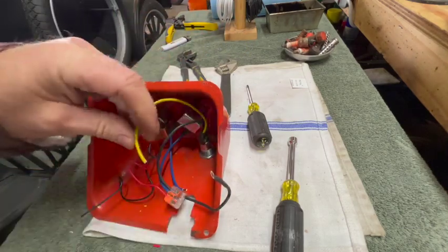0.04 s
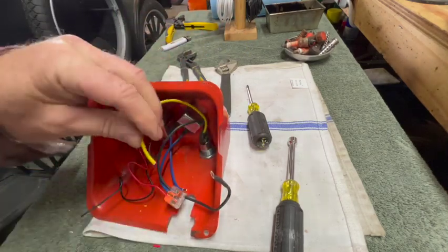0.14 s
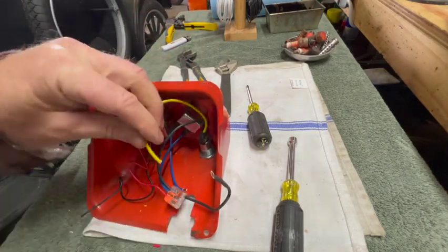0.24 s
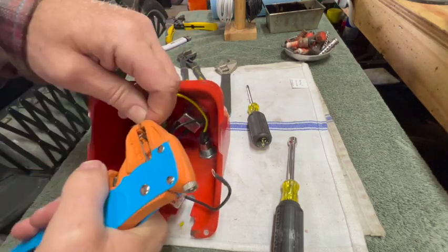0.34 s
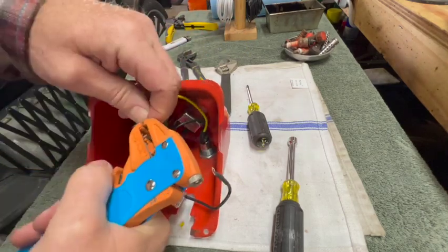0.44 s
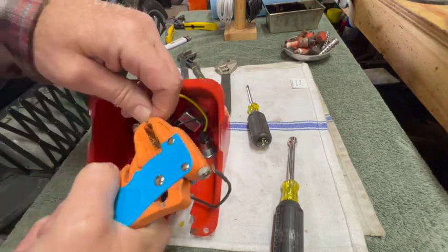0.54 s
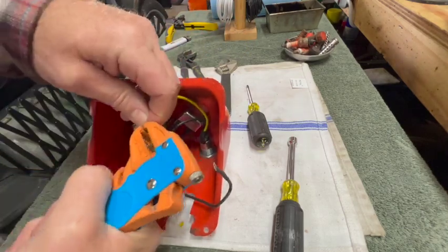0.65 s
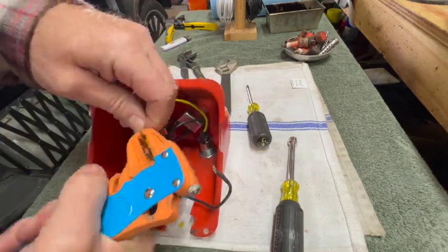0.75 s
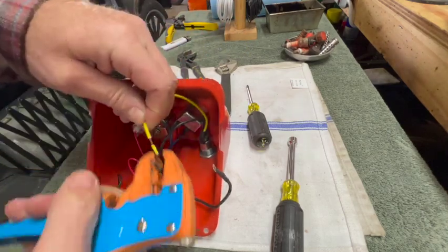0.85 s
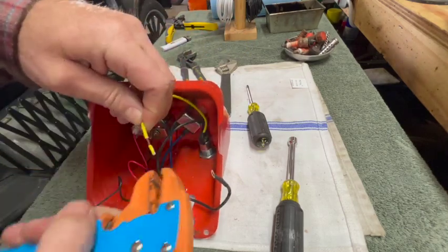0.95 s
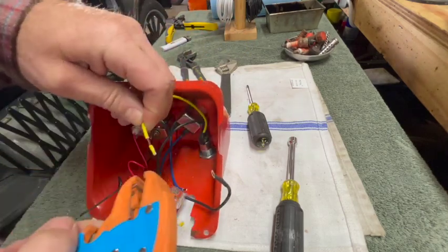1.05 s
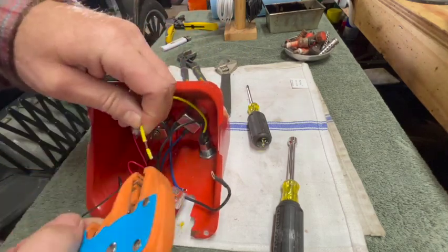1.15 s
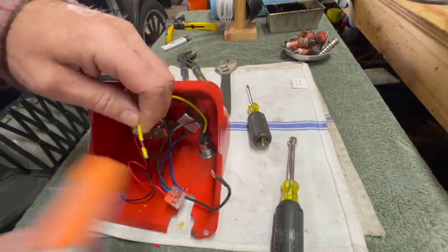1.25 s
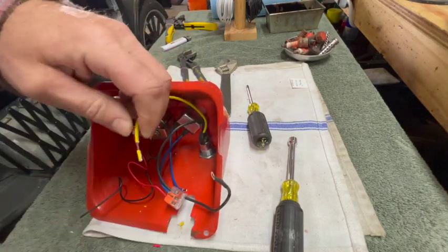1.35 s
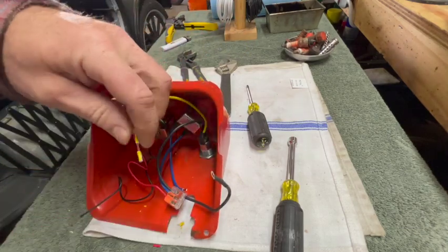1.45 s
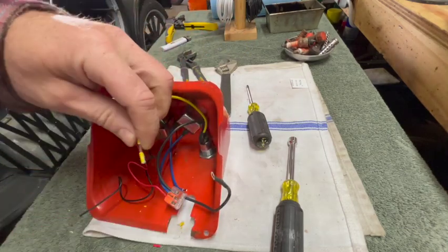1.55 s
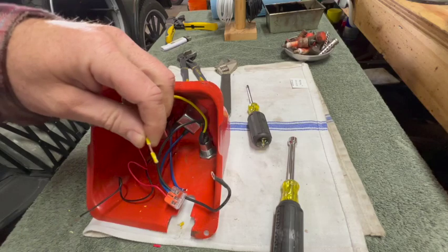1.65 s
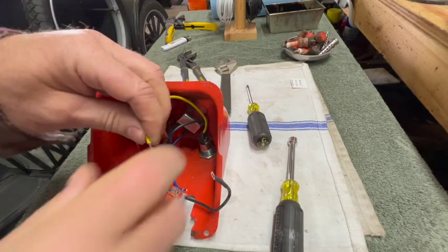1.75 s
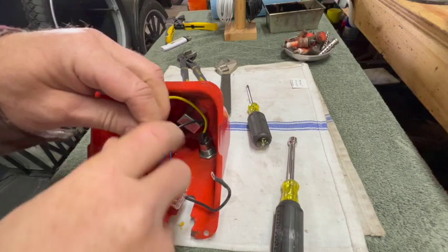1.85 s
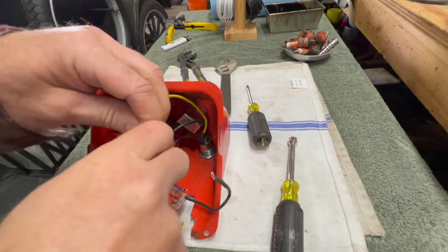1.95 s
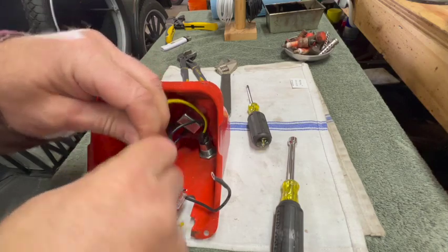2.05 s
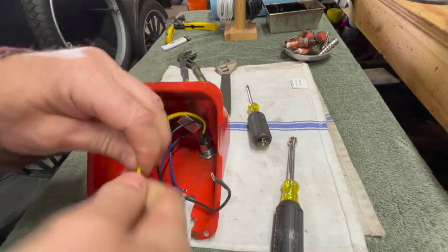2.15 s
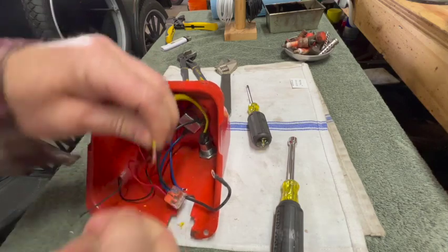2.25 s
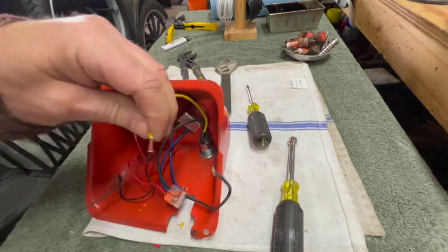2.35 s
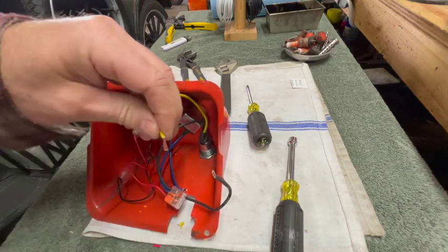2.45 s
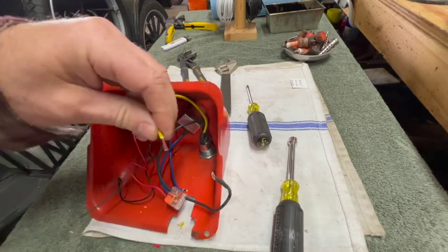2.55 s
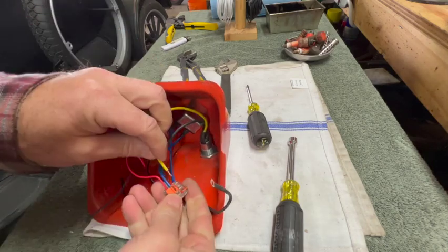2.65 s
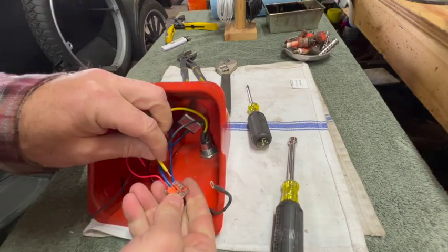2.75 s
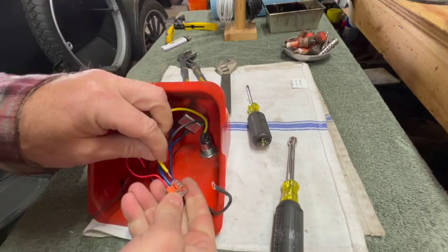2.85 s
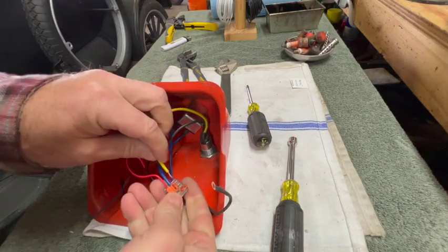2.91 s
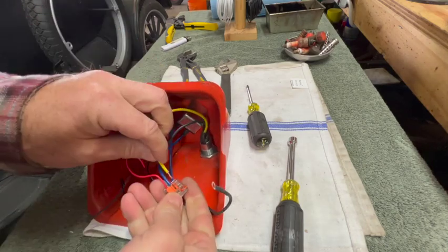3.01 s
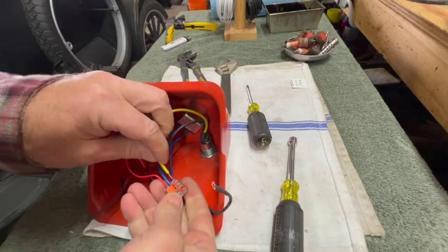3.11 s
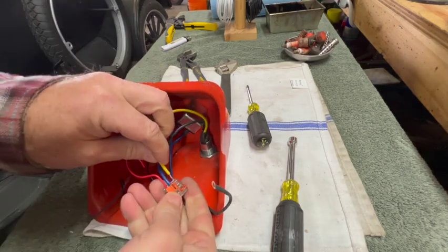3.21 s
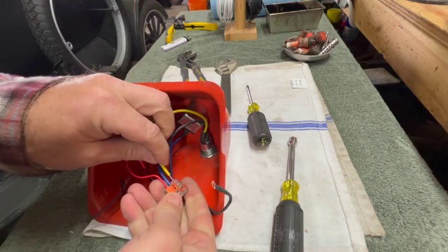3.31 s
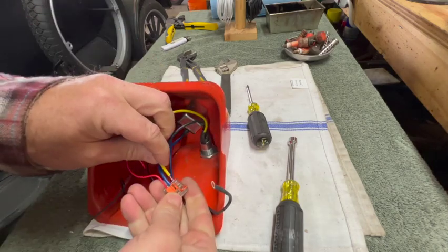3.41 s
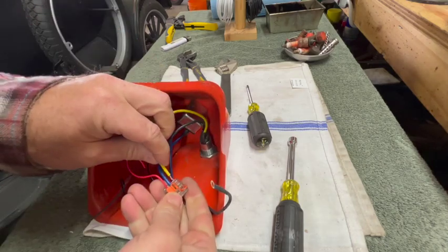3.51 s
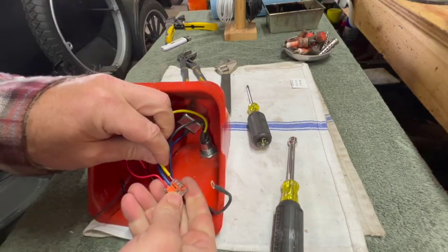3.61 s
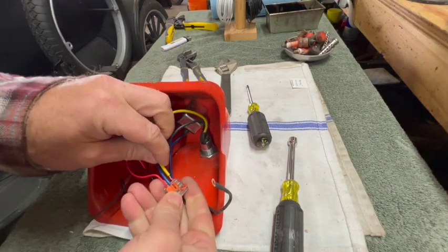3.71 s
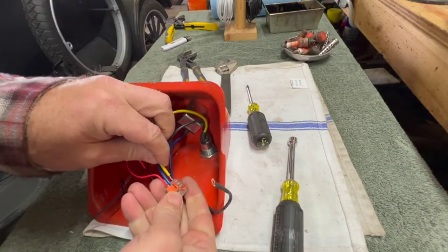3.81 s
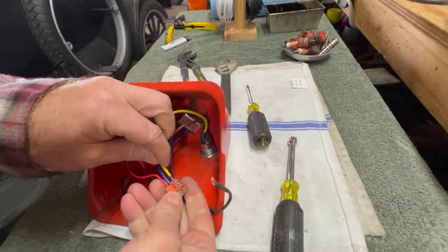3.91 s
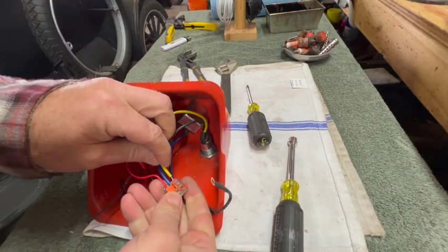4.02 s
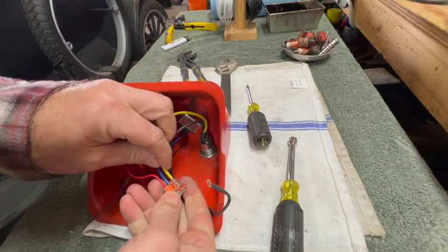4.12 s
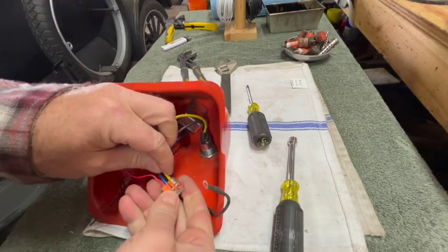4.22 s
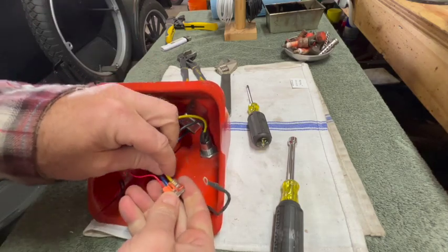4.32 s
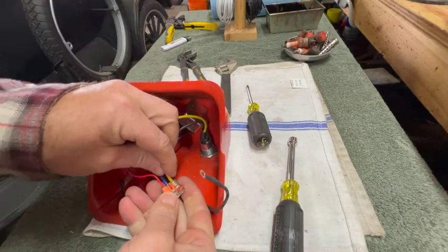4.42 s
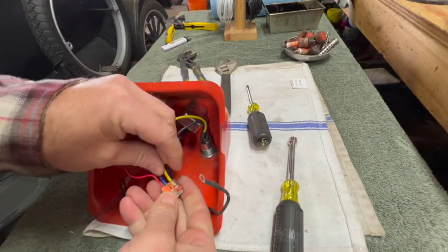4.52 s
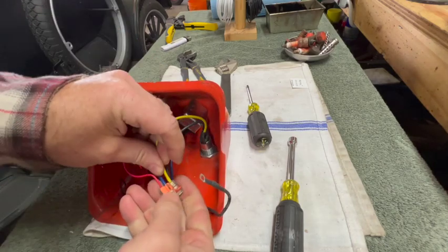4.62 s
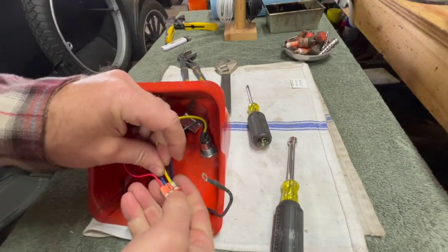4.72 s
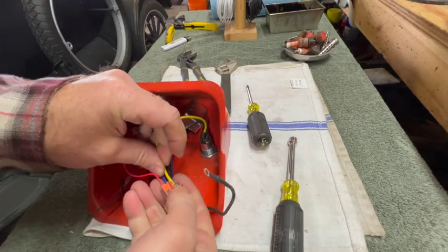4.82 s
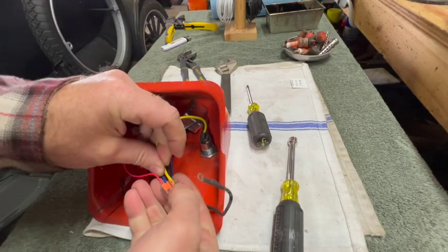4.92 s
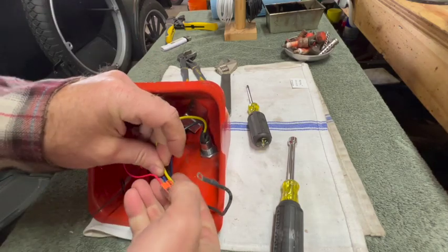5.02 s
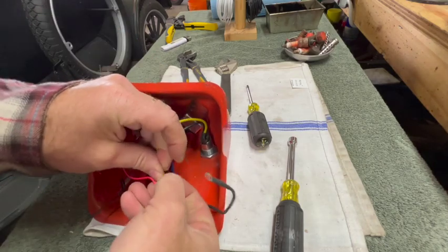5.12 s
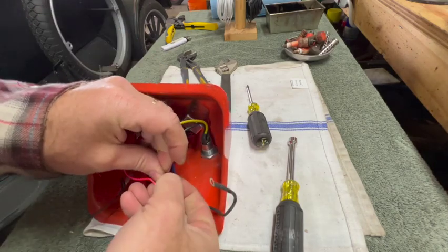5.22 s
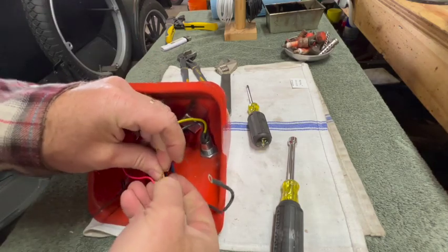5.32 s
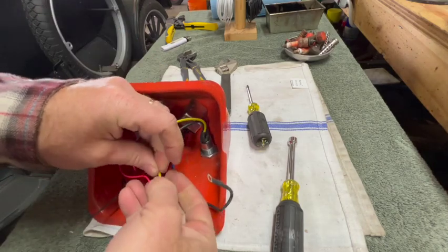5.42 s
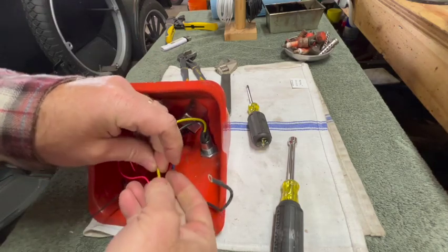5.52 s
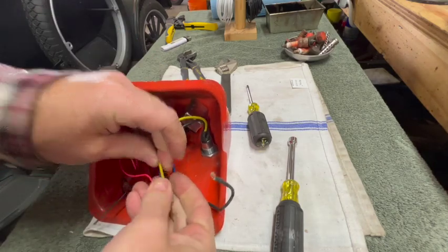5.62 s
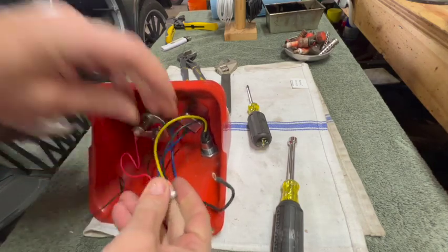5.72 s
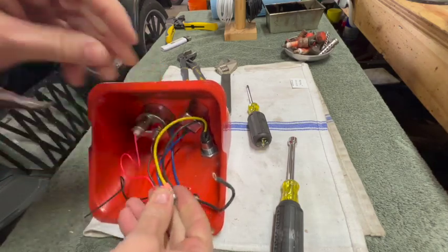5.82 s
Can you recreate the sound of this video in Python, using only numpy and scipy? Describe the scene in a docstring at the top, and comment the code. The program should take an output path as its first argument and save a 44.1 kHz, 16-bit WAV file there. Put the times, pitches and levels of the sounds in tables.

```python
"""Wire strippers bite, snap and spring open over a plastic box on a garage workbench, close to a phone;
then fingers twist the wire and push it into a lever connector with small ticks and one snap.
Clicks are noise bursts that excite damped modes; rustle, rough rings and hisses are grainy noise in bands.
Bench thuds are gliding damped sines; a far bird's falling whistles arrive as echoes, its second call doubled.
A narrow noise drone swells and fades, the garage adds dense short echoes, and coloured noise hums low."""
import sys
import numpy as np
from scipy import signal
from scipy.fft import rfft, irfft
from scipy.io import wavfile
from scipy.ndimage import uniform_filter1d

SR = 44100
rng = np.random.default_rng(int(sys.argv[2]) if len(sys.argv) > 2 else 0)


def file_out(sig):
    """Save sig as 16-bit WAV at sys.argv[1]."""
    # one column per channel
    cols = np.atleast_2d(sig).T
    # limit, then scale
    lim = np.clip(cols, -1, 1)
    pcm = np.round(lim * 32767).astype(np.int16)
    wavfile.write(sys.argv[1], SR, pcm)


N = 258410
LEFT_LAG = -12  # arrival at the left port relative to the right [samples]


def undb(db):
    """Level in decibels to amplitude ratio."""
    return 10 ** (np.asarray(db) / 20)


def unit(x):
    """Normalization to unit root-mean-square over the whole array."""
    return x / np.sqrt(np.mean(x ** 2))


def band(x, lo_hz, hi_hz):
    """Butterworth band-pass: maximally flat between its two corners."""
    sos = signal.butter(2, [lo_hz, min(hi_hz, .45 * SR)], "band", fs=SR, output="sos")
    return signal.sosfilt(sos, x)


def walk(rate):
    """Slow random modulation: values held for 1 / rate s, smoothed twice, with a spread near 1.8."""
    hold = int(SR / rate)
    steps = np.repeat(rng.standard_normal(N // hold + 1), hold)
    return 2.4 * uniform_filter1d(uniform_filter1d(steps, hold), hold)[:N]


def grainy_noise(n, depth_db):
    """Impulsive noise: exponentially distributed boosts in decibels roughen two-channel Gaussian noise."""
    noise = rng.standard_normal((2, n))
    return noise * undb(depth_db * np.minimum(rng.exponential(size=(2, n)), 5.))


def add(out, s, x, pan_db, lag=LEFT_LAG):
    """Stereo placement by level and arrival time: a negative lag reaches the left port first."""
    x = x * np.sqrt(np.linspace(1, 0, len(x)))  # the tail ends in silence
    left = int(s * SR) + lag // 2, pan_db / 2
    right = int(s * SR) - lag // 2, -pan_db / 2
    for ch, (i, db) in enumerate([left, right]):
        n = min(len(x), N - i)
        out[ch, i:i + n] += undb(db) * x[:n]


def rustle():
    """Friction noise: fibres slip in dense grains through a moving broad resonance; a hand rubs low down."""
    # sleeves, fingers and pulled insulation: (time [s], level [dB], brightest frequency [Hz])
    sleeve_path = [(0, -59.5, 4560), (.17, -61, 3600), (.3, -64, 3500), (.34, -67.5, 3330),
                   (.44, -61, 3260), (0.526, -89, 3180), (0.598, -46.5, 5600), (.78, -61, 3870),
                   (1., -69, 4020), (1.15, -86.5, 3940), (1.3, -62.5, 4300), (1.5, -69.5, 5370),
                   (1.65, -67, 5860), (1.75, -68, 3980), (2.05, -71.5, 4180), (2.38, -67, 4870),
                   (2.56, -95.5, 3520), (2.67, -68.5, 3930), (2.799, -89, 3220), (4.05, -94, 3220),
                   (4.119, -82, 3985), (4.26, -74, 5000), (4.33, -86.5, 4020), (5.079, -83, 3534),
                   (5.12, -48.5, 8470), (5.329, -80, 6000), (5.55, -80, 3470), (5.661, -65.5, 3830),
                   (5.86, -71.5, 3400)]
    # level of the dull rub between 750 and 1700 Hz: (time [s], level [dB])
    dull_path = [(0.0, -94), (0.39, -65), (0.59, -59), (0.72, -61), (0.86, -63.5), (0.99, -73),
                 (2.04, -67.5), (2.97, -71), (3.85, -88.5), (4.16, -70.5), (4.28, -74.5), (5.86, -67.5)]
    # a hand drags over the box: (start [s], peak level [dB], fading [dB/s])
    drags = [(.36, -52, 194.3), (1.749, -52.5, 22.4)]
    drag_attack_s = 0.051

    t = np.arange(N) / SR
    s, *columns = np.transpose(sleeve_path)
    db, bright_hz = (np.interp(t, s, c) for c in columns)
    grains = grainy_noise(N, 2.2)
    grains[0] += 0.21 * np.roll(grains[1], LEFT_LAG)  # partly shared by the ports

    dull_db = np.interp(t, *np.transpose(dull_path)) + 0.74 * walk(37)
    # a one-second shift keeps the dull grains apart from the bright ones
    out = undb(dull_db) * unit(band(np.roll(grains, SR, axis=1), 750, 1700))

    for k, hz in enumerate(1700 * 2 ** np.arange(0, 3, .5)):
        octaves = np.log2(hz / bright_hz)
        # the resonance falls more steeply above its peak than below
        off_db = -np.where(octaves > 0, 8., 3.5) * octaves ** 2
        level = undb(db + off_db + 1.0 * walk(22))
        strip = unit(band(band(grains, hz / 1.448, hz * 1.412), 830, 9200))
        out = out - (-1) ** k * level * strip  # neighbouring bands alternate in sign

    drag = 0
    for s, peak_db, fade in drags:
        rise = np.clip((t - s) / drag_attack_s, 0, 1) ** 2
        drag = drag + rise * undb(peak_db - fade * np.maximum(t - s - drag_attack_s, 0))
    return out + drag * undb(2.6 * walk(40)) * unit(band(grains, 93, 350))


def hum():
    """Spectrally shaped Gaussian noise: low building rumble and faint hiss, correlated by frequency."""
    # relative spectrum: (frequency [Hz], density [dB per Hz])
    spectrum = [(12, -55), (20, -21.5), (82, -3.5), (108, -4), (174, -20.5), (342, -19), (404, -23),
                (634, -27.5), (913, -25), (1140, -34), (1690, -39), (2370, -50.5), (7510, -52),
                (16500, -70)]
    # likeness of the two ports: (frequency [Hz], left-right correlation [-1 to 1])
    likeness = [(60, 0.96), (130, 0.85), (290, 0.28), (640, -0.6), (1400, 0.46)]
    # slow change of level: (time [s], level [dB])
    swell = [(0, 2), (.6, 2), (1.1, -0.5), (2., 1), (2.7, 0), (3.6, -1), (4.6, 0.5), (5.1, 2.5), (5.86, -2)]
    hum_db = -57

    log_hz = np.log(np.fft.rfftfreq(N, 1 / SR) + 1)
    colour_hz, colour_db = np.transpose(spectrum)
    colour = undb(np.interp(log_hz, np.log(colour_hz), colour_db))
    like_hz, correlation = np.transpose(likeness)
    like = np.clip(np.interp(log_hz, np.log(like_hz), correlation), -1, 1)

    # the mid-to-side power ratio sets the correlation
    mid, side = rfft(rng.standard_normal((2, N))) * colour * np.sqrt([1 + like, 1 - like])
    noise = unit(irfft(np.array([mid + side, mid - side]), N))
    swell_db = np.interp(np.arange(N) / SR, *np.transpose(swell))
    return undb(hum_db + swell_db + 0.74 * walk(4)) * noise


def modal_ring(t, hz, db, t60):
    """Modal superposition: a sum of exponentially damped sines, the impulse response of a solid body."""
    return np.sum(undb(db) * np.sin(2 * np.pi * hz * t) * 1000. ** (-t / t60), axis=0)


def clicks(events, modes, ring_db, reach_oct, crack_ms, rattle_ms, body_hz, treble_pan_db, knock_db):
    """Impact excitation: a short crack and fading rattle ring the modes nearest the click's own colour."""
    # low knock of the open box: (frequency [Hz], level [dB], t60 [s])
    hollow_modes = [(612, 2, .06), (1020, -6.5, 0.021), (1480, 2.5, 0.042), (1660, 4.5, .06),
                    (2050, 0.5, .05)]
    shorter_db_per_db = 0.2933  # a harder click cracks faster
    softer_db_per_db = 1  # a loose, rattling contact cracks more slowly
    treble_fades_faster = 1.8  # factor on the treble rattle's decay rate

    out, t = np.zeros((2, N)), np.arange(SR // 5) / SR
    mode_hz, mode_db, t60 = np.transpose(modes)[:, :, None]
    hollow_ring = modal_ring(t, *np.transpose(hollow_modes)[:, :, None])
    for s, db, hz, treble_db, body_db, rattle_db, pan_db in events:
        noise = rng.standard_normal((3, len(t)))  # mid, treble, body
        scatter = rng.standard_normal((len(modes), 1))

        hardness_db = -shorter_db_per_db * (db + 32.0)
        looseness_db = softer_db_per_db * max(rattle_db + 7.0, 0)
        u = t * 1000 / max(crack_ms * undb(hardness_db + looseness_db), .15)
        fade = np.exp(-t * 1000 / rattle_ms) ** np.array([[1], [treble_fades_faster], [1]])
        crack = (np.e * u * np.exp(-u)) ** 2  # peaks at u = 1
        rattle = undb(rattle_db) * (1 - np.exp(-u)) * fade
        mid_push, treble_push, body_push = noise * (crack + rattle)

        near_db = -6 * (np.log2(mode_hz / hz) / reach_oct) ** 2 + 0.9 * scatter
        ring = signal.fftconvolve(mid_push, modal_ring(t, mode_hz, mode_db + near_db, t60))[:len(t)]
        mid = band(band(mid_push, hz * .55, hz * 1.7), hz * .55, hz * 1.7)
        mid = mid / np.abs(mid).max() + undb(ring_db) * ring / np.abs(ring).max()

        body = band(band(body_push, *body_hz), *body_hz)
        knock = signal.fftconvolve(body, hollow_ring)[:len(t)]
        body = body / np.abs(body).max() + undb(knock_db) * knock / np.abs(knock).max()

        treble = band(treble_push, 9900, 16000)
        mid = undb(db) * mid / np.abs(mid).max()
        body = undb(db + body_db) * body / np.abs(body).max()
        treble = undb(db + treble_db) * treble / np.abs(treble).max()
        add(out, s - .0005, mid + body, pan_db)
        add(out, s - .0005, treble, treble_pan_db)  # the top has its own fixed balance
    return out


def stripper_clicks():
    """Impact on metal: the jaws' bites and snaps excite the tool's damped modes."""
    # clicks of the tool: (time [s], mid peak level [dB], brightest frequency [Hz], treble re mid [dB],
    # body re mid [dB], rattle re crack [dB], left over right [dB])
    bites = [(0.025, -24.5, 5240, -22, -52, -32.5, 14), (0.3533, -50.5, 3930, -9, -2, -21, 16.5),
             (0.428, -34.5, 3560, -12, 1.5, -25, 9), (0.5445, -25, 4940, -22, -5, -5, 1.5),
             (0.551, -13, 5140, 6, -19.5, -18, 19.5), (0.5552, -7.5, 3740, -7, -20, -46, 7),
             (0.5665, -21.5, 5230, -13, -9, 2.5, 7), (0.7862, -30.5, 4300, -4.5, -28, -16, 12.5),
             (0.8052, -27.5, 4600, -15, -28, -6, 15.5), (0.811, -22, 2860, -16, -33, -17, 11),
             (0.8162, -25.5, 5830, 9, -20, -19, 20.5), (0.8534, -21.5, 4870, -5, -26, -19.5, 11),
             (0.864, -31.5, 2860, -23, -8, -21, 9.5), (1.317, -15, 6220, -10.5, -24, -26.5, 15)]
    # resonances of the tool: (frequency [Hz], level [dB], t60 [s])
    tool_modes = [(2600, -2.5, 0.017), (3310, -5, 0.019), (3684, 5.5, 0.014), (4190, -2.5, 0.0093),
                  (5300, 2, 0.034), (6120, -4.5, 0.017), (7460, -0.5, 0.021), (8650, -2, 0.015)]
    return clicks(bites, tool_modes, ring_db=-5.0, reach_oct=0.69, crack_ms=1.5, rattle_ms=20,
                  body_hz=(1050, 2800), treble_pan_db=-0.5, knock_db=-10)


def garage(x):
    """Diffuse reverberation: dense echoes off walls and shelves decay as noise, the treble sooner."""
    t60_s, treble_loss = 0.038, 0.74  # treble_loss: share of the ring time that the treble loses
    first_echo_s = 0.002  # build-up time of the echoes
    t = np.arange(SR // 2) / SR
    noise = rng.standard_normal((2, len(t))) * np.clip(t / first_echo_s, 0, 1) * (1 - 2 * t)
    treble_t60_s = t60_s * (1 - treble_loss)
    tail = band(noise, 93, 6000) * 1000. ** (-t / t60_s)
    tail = tail + band(noise, 4900, 17000) * 1000. ** (-t / treble_t60_s)
    tail = tail / np.sqrt(np.sum(tail[0] ** 2))
    return signal.fftconvolve(x[None], tail, axes=1)[:, :N]


def thuds():
    """Damped resonance with a pitch glide: hard pushes ring the bench low, reaching the left port first."""
    # pushes on the bench: (time [s], level [dB], settled pitch [Hz], t60 [s])
    pushes = [(0.555, -18.5, 74.8, 0.1), (1.901, -41, 83.6, 0.21), (2.422, -47, 69.4, 0.39),
              (5.093, -20, 81, 0.071), (5.196, -45.5, 52.5, 0.44)]
    glide, glide_s = 1.5, 0.0071  # starts this share above the settled pitch; time constant of the fall
    swell_s = 0.0054  # time constant of the onset

    out, t = np.zeros((2, N)), np.arange(SR // 2) / SR
    for s, db, hz, t60 in pushes:
        phase = 2 * np.pi * hz * (t + glide * glide_s * (1 - np.exp(-t / glide_s)))
        tone = np.sin(phase) + 0.13 * np.sin(1.4 * phase) + 0.45 * np.sin(.55 * phase)
        # the box knocks briefly
        tone = tone + undb(-8.5) * np.sin(2 * np.pi * 1.4 * hz * t) * np.exp(-t / .015)
        envelope = (1 - np.exp(-t / swell_s)) ** 2 * 1000. ** (-t / t60)
        add(out, s, undb(db) * tone * envelope, 4.0, lag=-90)
    return out


def rough_rings():
    """Grainy noise bands: rough rings trail the snip, tool click and snap, with a few soft hisses between."""
    # rings and hisses: (start [s], rise [s], peak level [dB], t60 [s], centre [Hz], width [Hz])
    noise_bands = [(.56, 0.024, -51, 1.9, 3640, 800), (.57, .03, -62, 1.3, 1690, 300),
                   (.57, 0.012, -50, 0.81, 6800, 4500), (1.319, .005, -59, 0.58, 5180, 160),
                   (1.319, .005, -59.5, 0.42, 7430, 120), (1.319, 0.0055, -67.5, 0.49, 3660, 151),
                   (1.32, 0.0044, -51, 0.26, 6900, 3000), (1.5, 0.038, -61.5, 0.38, 5610, 2535),
                   (1.58, 0.033, -66, 0.26, 2700, 900), (1.611, 0.025, -58, 0.29, 6000, 503),
                   (1.61, 0.035, -60, 0.19, 7850, 1520), (5.105, 0.012, -54.5, 0.87, 5550, 1490),
                   (5.104, .015, -55.5, 0.45, 7900, 3500), (5.71, 0.035, -72, 1.3, 3420, 299)]
    pan_db = 10.5  # left over right

    out, t = np.zeros((2, N)), np.arange(SR // 2) / SR
    for s, rise, db, t60, hz, width_hz in noise_bands:
        grains = grainy_noise(len(t), 2.4)
        decay = 1000. ** (-np.maximum(t - rise, 0) / t60) * (1 - 2 * t)  # silent after half a second
        shape = np.clip(t / rise, 0, 1) ** 2 * decay
        x = undb(db) * shape * unit(band(grains, hz - width_hz / 2, hz + width_hz / 2))
        i = int(s * SR)
        out[:, i:i + len(t)] += (x * undb([[pan_db / 2], [-pan_db / 2]]))[:, :N - i]
    return out


def connector_ticks():
    """Impact on plastic: wire, box and connector contacts excite the box's damped modes."""
    # ticks and the snap: (time [s], mid peak level [dB], brightest frequency [Hz], treble re mid [dB],
    # body re mid [dB], rattle re crack [dB], left over right [dB])
    contacts = [(1.573, -46.5, 4800, -34, -20.5, -10.5, 4), (2.2088, -26.5, 7100, -19, -21.5, -27, 3),
                (2.2274, -42.5, 6880, -20.5, -7.5, -16, 5.1), (2.4172, -31.5, 3850, -8, -18, 1, 11.5),
                (2.4272, -30, 2140, -27, -25, -7, 2.8), (2.4394, -44.5, 2040, -33.5, 0, -5.5, 2.8),
                (2.6365, -60, 2060, -14, 4.5, -1, 5), (2.7039, -55, 2140, -14.5, 4.5, -2, 6),
                (2.7565, -43.5, 3320, -22, 2, -7, 8), (3.341, -76.5, 6000, 9, -3.5, -25.5, 4),
                (3.364, -78, 6000, 0.5, -3, -24.5, 4), (3.448, -56.5, 5000, 3.5, 3.5, -32, 4),
                (3.621, -85.5, 6040, 10.5, -5.5, -20.5, 4), (3.6644, -69.5, 2184, 11.5, 12, -9, 5.1),
                (3.6934, -72, 2057, 16, 13.5, -20, 4), (3.7233, -67.5, 2200, 12, 9, -23.5, 4),
                (4.228, -58.5, 5160, 3, 10, 3.5, 5.3), (4.2542, -66.5, 3920, -18.5, 15, 7.5, 3.5),
                (4.4345, -50, 1950, -6, 6.5, -4.5, 10), (4.4859, -35, 4560, -11.5, -10.5, -13, 8.2),
                (4.63, -66.5, 8870, 5, -9.5, 2, 4.9), (4.8075, -46.5, 3770, -15, 0, -10.5, 4.3),
                (4.855, -52.5, 3890, -11, 4, 4, 7.6), (4.8707, -44, 3900, -9.5, -0.5, -13, 16),
                (4.887, -53.5, 4000, -16, 7.5, -13.5, 6.8), (5.0855, -52, 5300, -20, 8, -7, 4.4),
                (5.0931, -13.5, 6650, 6, -19, -21, 4.1), (5.1056, -19, 6500, -28, -23, -16.5, 13.4),
                (5.262, -54, 3960, -34.5, 3.5, 9, 5.9), (5.3984, -50, 6000, -18, -15, -5, 8),
                (5.416, -50.5, 3100, -8.5, 2, -5.5, 5), (5.61, -52, 3580, -8.5, 3.5, 8.5, 5.6),
                (5.686, -50, 5000, -3.5, -30.5, 8, 8.9), (5.7012, -50, 4900, -6, -22.5, -19, 8.6),
                (5.705, -43.5, 2970, -25.5, 1, -6.5, 12.3)]
    # resonances of the box: (frequency [Hz], level [dB], t60 [s])
    box_modes = [(646, -2, 0.029), (1360, -24.5, 0.017), (1625, -5, 0.09), (2133, 21.5, 0.021),
                 (2770, 14.5, 0.011), (3399, -7.5, 0.1), (4094, 3, 0.0092), (5060, -6, 0.011),
                 (5888, 2.5, 0.015), (6720, 6, 0.0043)]
    return clicks(contacts, box_modes, ring_db=3.5, reach_oct=0.51, crack_ms=1.23, rattle_ms=28.1,
                  body_hz=(560, 2200), treble_pan_db=-4.0, knock_db=1.0)


def bird():
    """Frequency modulation and diffuse echo: falling, hoarse whistles reach the ear only as echoes."""
    # falling whistles: (start [s], length [s], first pitch [Hz], pitch approached [Hz], starting level [dB])
    whistles = [(2.078, 0.13, 5830, 3570, -59), (3.122, 0.15, 6670, 3527, -63),
                (3.145, 0.12, 3700, 3100, -69)]
    fall = 0.31  # time constant of the fall as a share of the length
    edge_s, swell_db = 0.016, 3.5  # fade at either end; gain reached by the end

    t, tone = np.arange(N) / SR, 0
    for s, length, first_hz, last_hz, db in whistles:
        share = np.clip((t - s) / length, 0, 1)
        hoarseness = 1 + 0.05 * (1 - 0.633 * share) * walk(400)
        pitch = (last_hz + (first_hz - last_hz) * np.exp(-share / fall)) * hoarseness
        edges = np.clip(np.minimum(share, 1 - share) * length / edge_s, 0, 1)
        whistle = np.sin(2 * np.pi * np.cumsum(pitch) / SR)
        tone = tone + whistle * edges * undb(db + swell_db * share)

    tail = np.arange(SR // 2) / SR
    echoes = rng.standard_normal((2, len(tail))) * 1000. ** (-tail / 0.4)
    echoes = echoes / np.sqrt(np.sum(echoes[0] ** 2))
    return signal.fftconvolve(tone[None], echoes, axes=1)[:, :N]


def drone():
    """Narrow-band noise: its random beating makes a faint wavering drone that swells and fades once."""
    start_s, end_s, level_db = 2.74, 3.4, -73
    share = np.clip((np.arange(N) / SR - start_s) / (end_s - start_s), 0, 1)
    swell = (np.sin(np.pi * share) + 1e-9) ** .3 * (share > 0) * (share < 1)
    noise = unit(band(rng.standard_normal((2, N)), 573, 623))
    return undb(level_db + 2.2 * walk(20)) * swell * noise


def scene():
    """Linear superposition of all sources; the clicks alone excite the garage."""
    hands = stripper_clicks() + connector_ticks()
    echoes = undb(-16) * garage(hands.mean(axis=0))
    return hands + echoes + thuds() + rustle() + rough_rings() + bird() + drone() + hum()


def record(dry):
    """Elliptic low-pass: the phone cuts the top steeply above 16.8 kHz."""
    return signal.sosfilt(signal.ellip(10, .2, 80, 16800, fs=SR, output="sos"), dry)


dry = scene()
out = record(dry)
file_out(out)
```